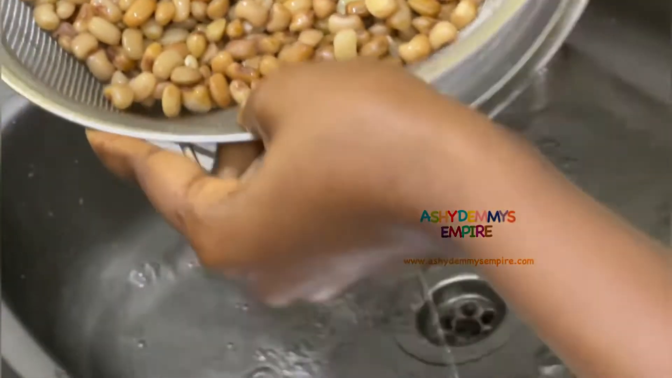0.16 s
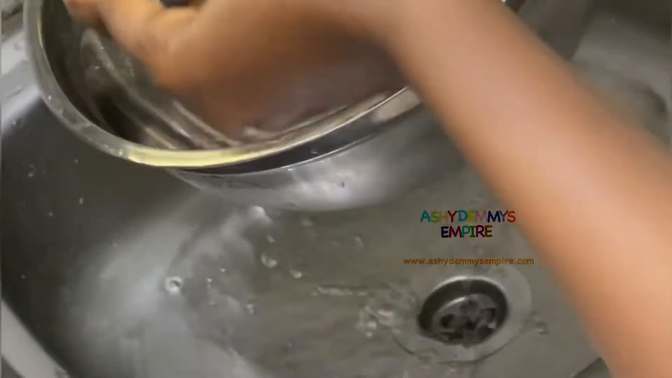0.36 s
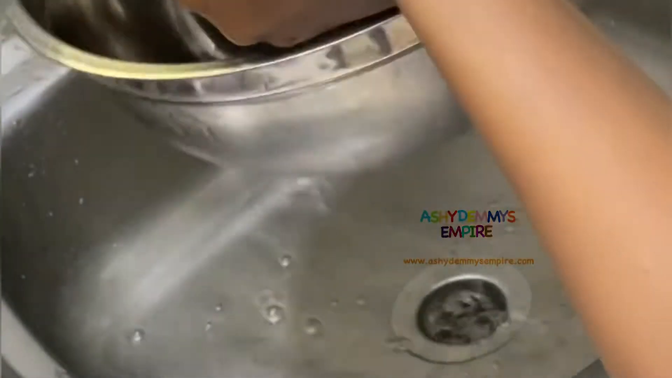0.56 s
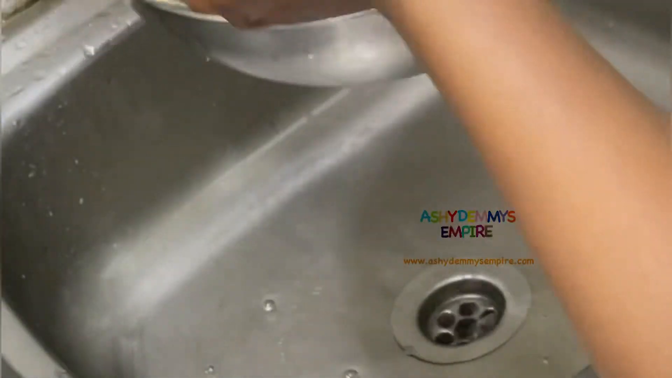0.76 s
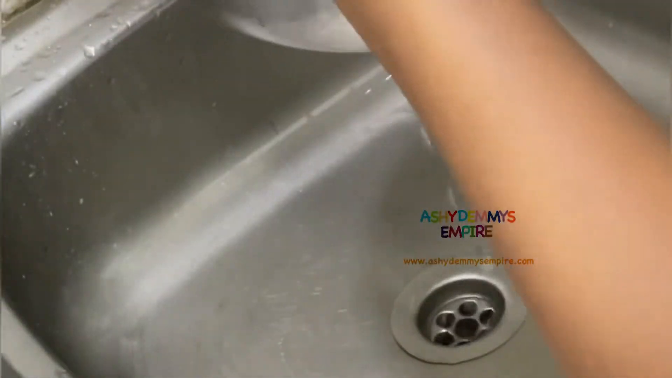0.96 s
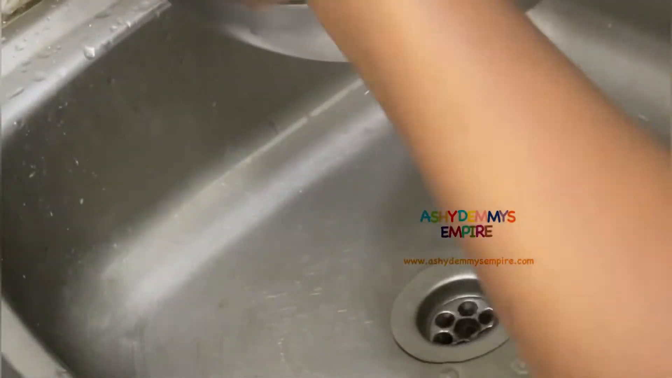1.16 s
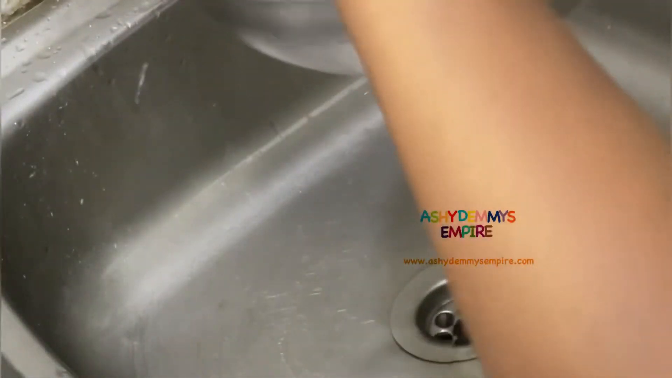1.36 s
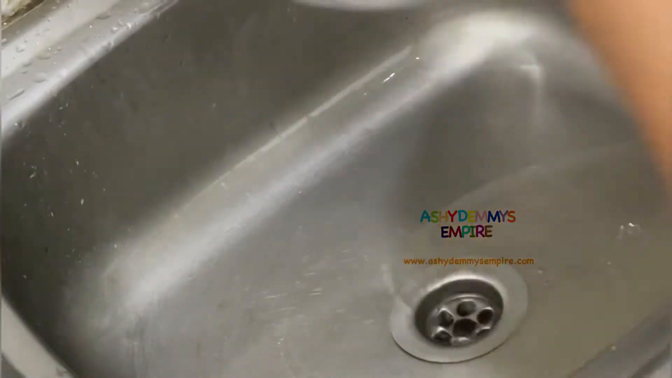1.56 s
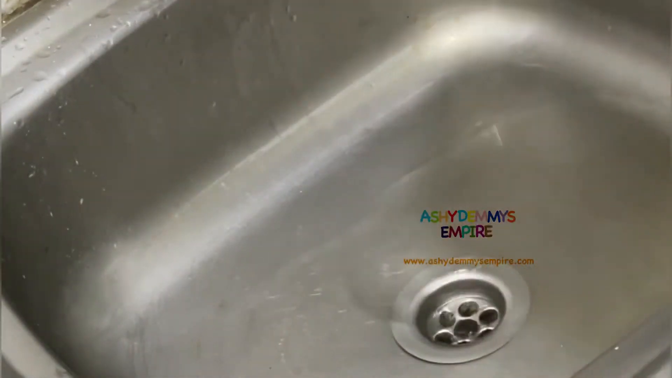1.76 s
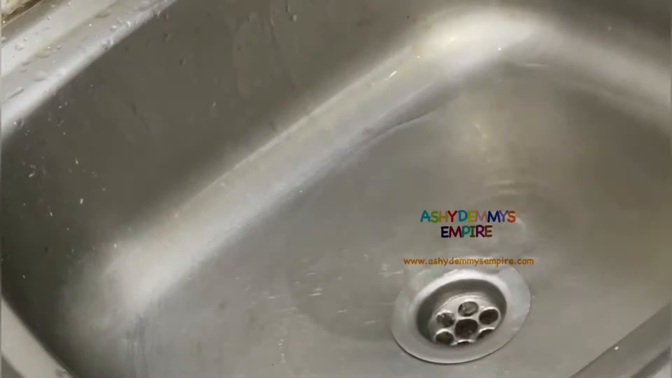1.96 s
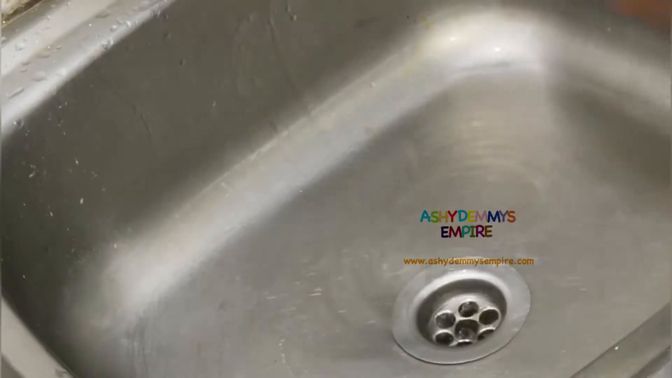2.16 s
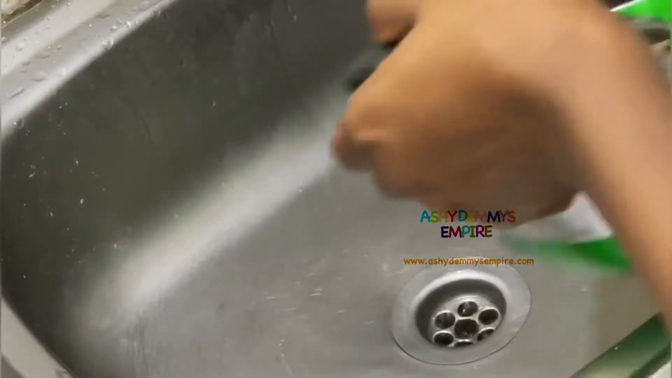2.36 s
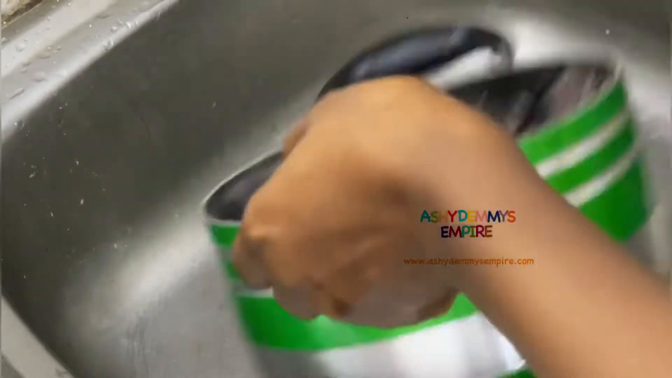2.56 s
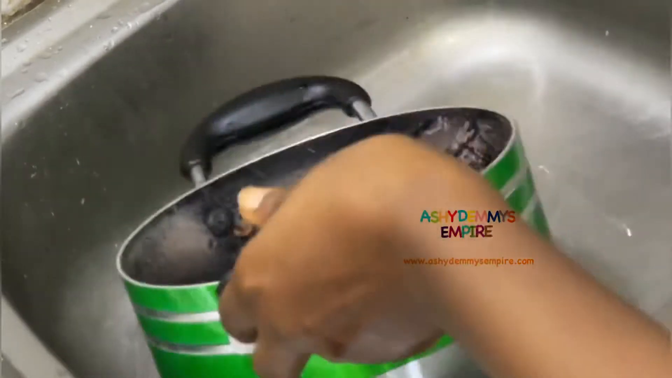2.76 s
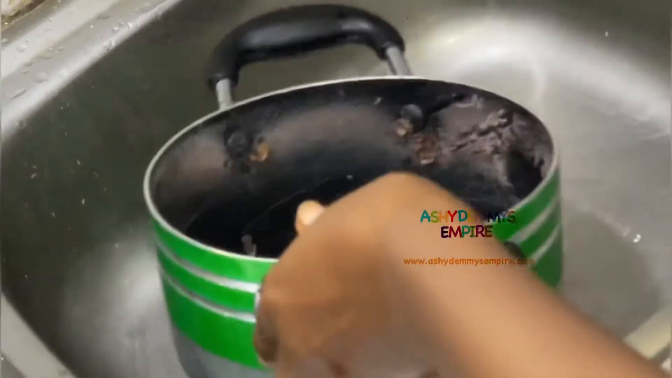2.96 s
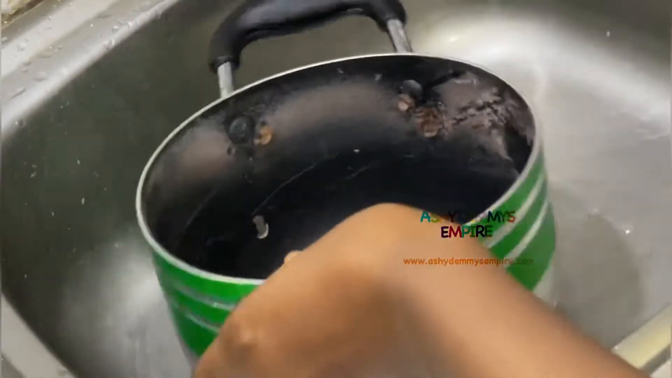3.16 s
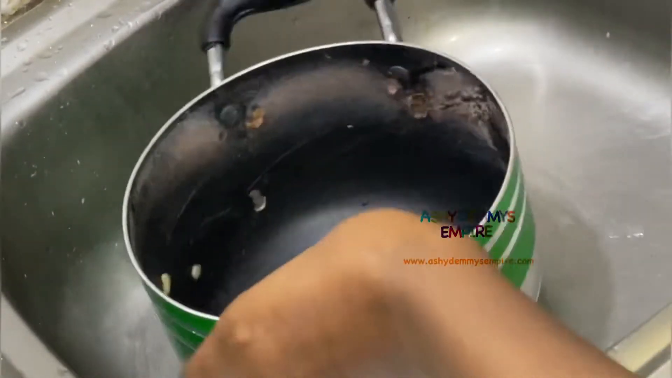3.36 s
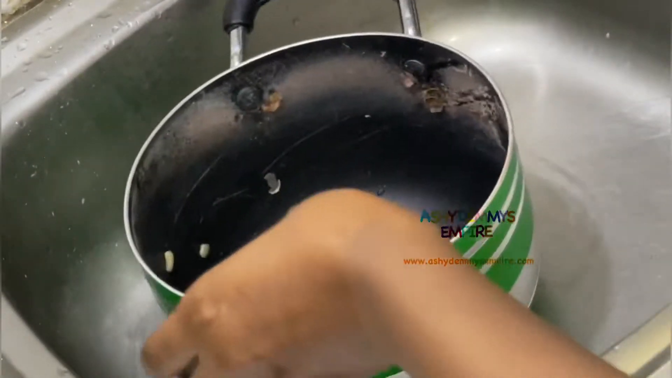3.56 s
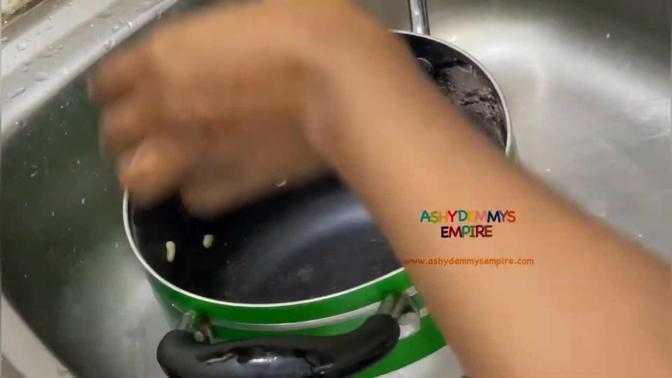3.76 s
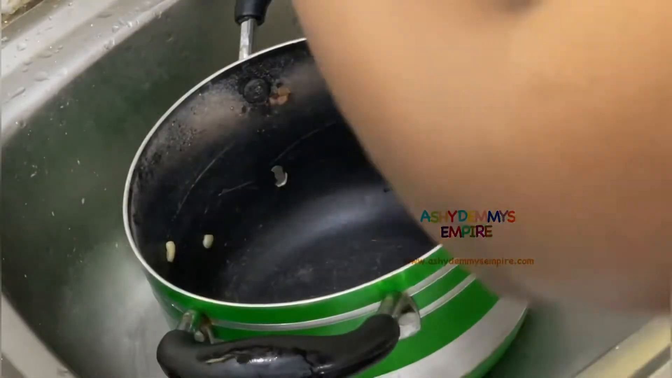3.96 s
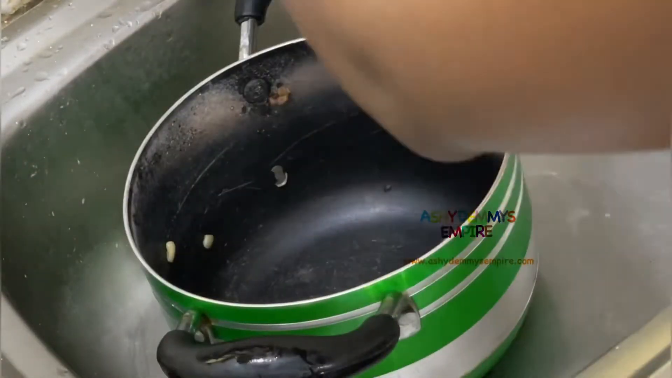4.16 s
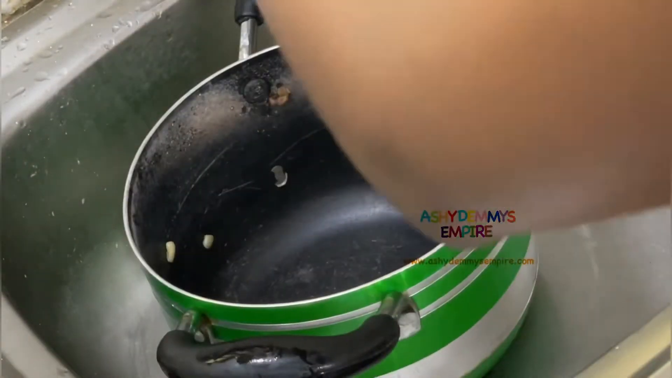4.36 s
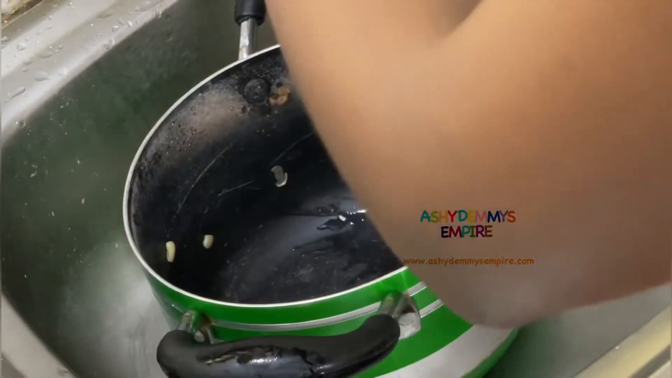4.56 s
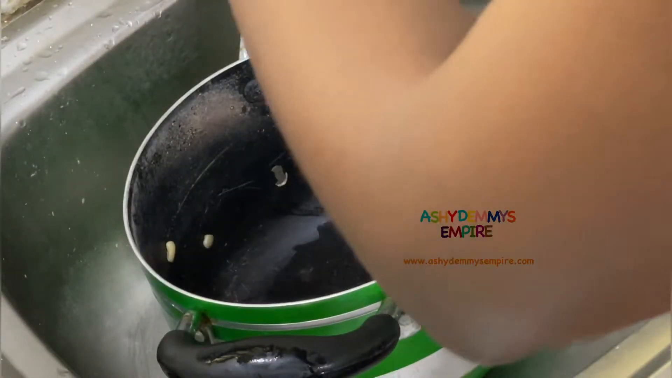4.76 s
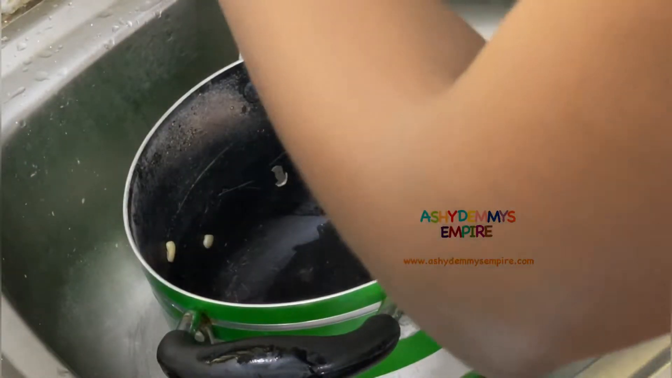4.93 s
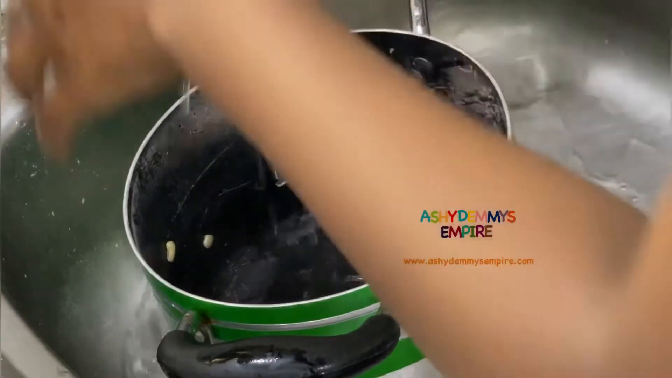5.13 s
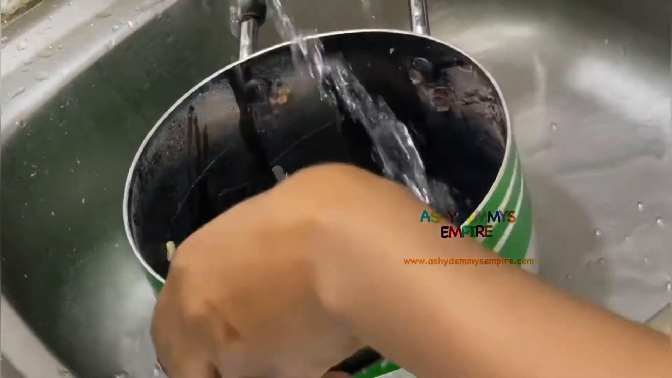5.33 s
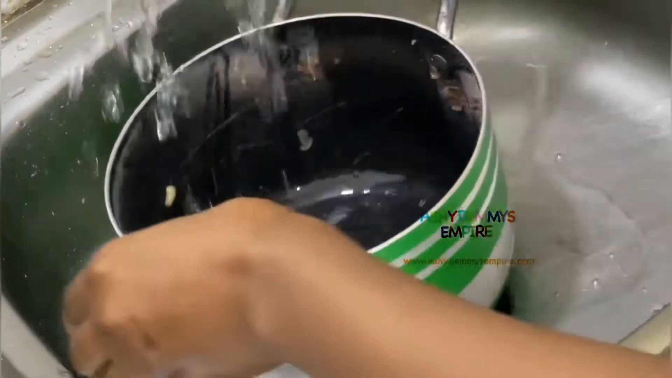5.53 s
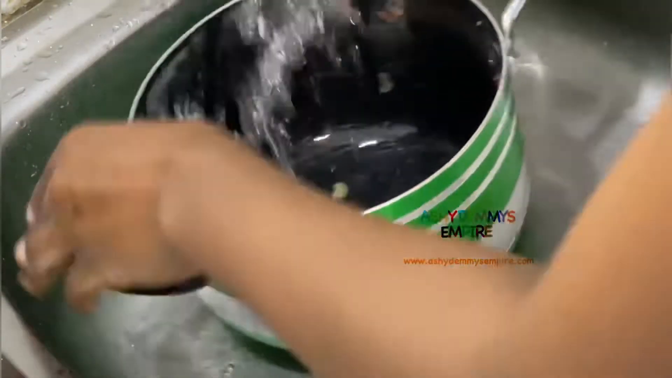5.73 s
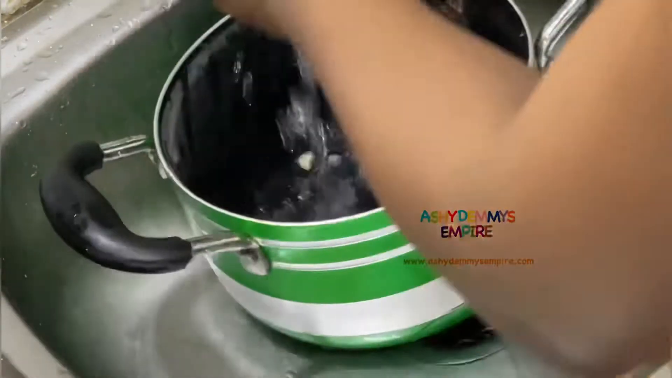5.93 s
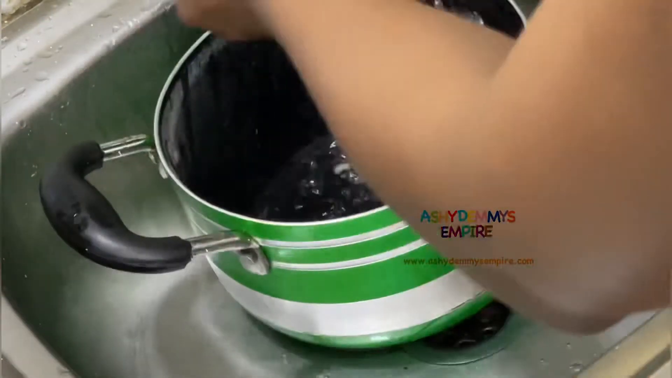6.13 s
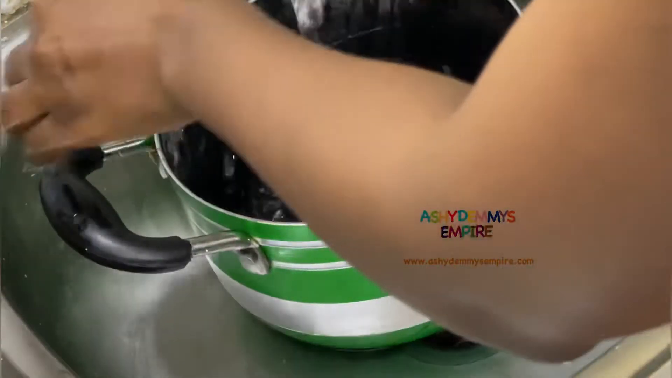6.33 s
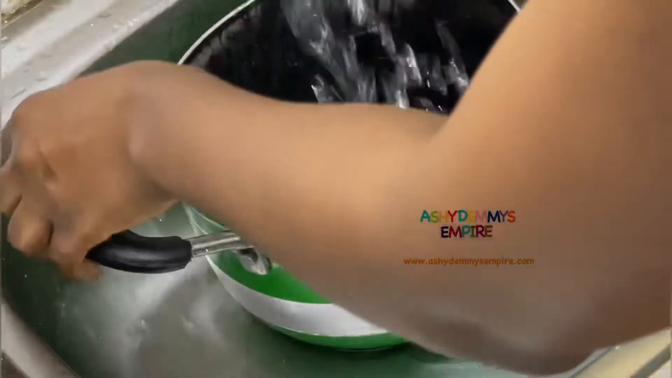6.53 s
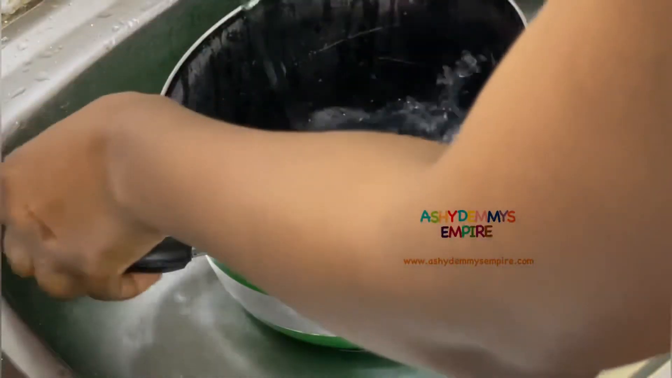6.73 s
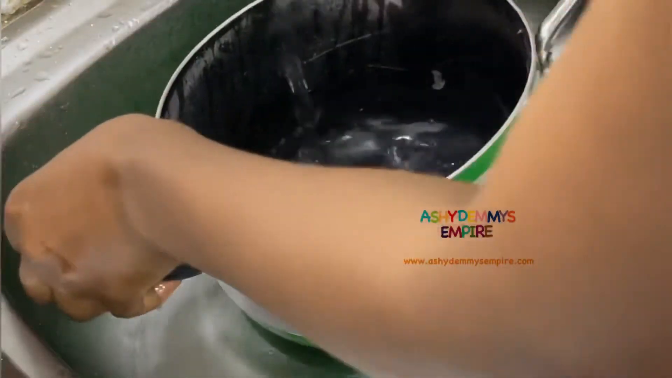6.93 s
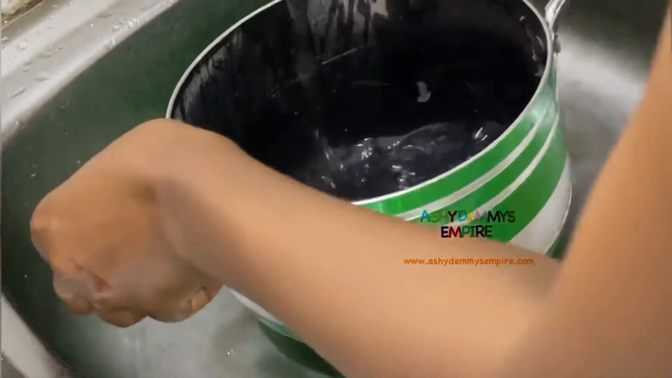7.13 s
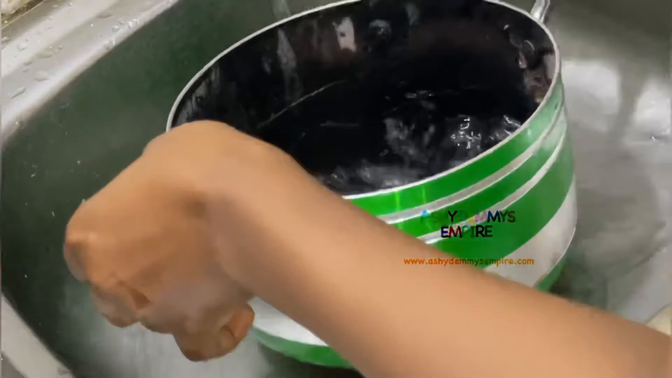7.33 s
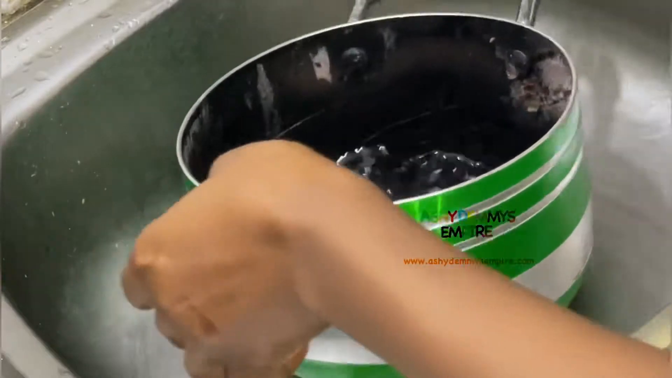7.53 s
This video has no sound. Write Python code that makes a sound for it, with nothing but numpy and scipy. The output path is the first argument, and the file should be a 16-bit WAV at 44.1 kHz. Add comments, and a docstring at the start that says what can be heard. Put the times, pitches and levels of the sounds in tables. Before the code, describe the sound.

A metal strainer of beans clanks into a steel bowl, a pot scrapes and bangs into a sink, then water gushes in.

```python
"""A strainer clanks brightly into a metal bowl, beans rustle and run-off trickles; then a pot is dragged over
a steel basin in short pushes and dropped in, and rinse water gushes in, spattering, bubbling and drumming.
Metal is struck modes plus dense noisy bands; scraping is stick-slip pulses and grit driving those modes.
Water is swarms of rising bubble tones and random clicks. A machine hums behind, over steady kitchen noise."""
import sys
import numpy as np
from scipy import signal
from scipy.fft import rfft, irfft, next_fast_len
from scipy.io import wavfile
from scipy.ndimage import uniform_filter1d

SR = 44100
rng = np.random.default_rng(int(sys.argv[2]) if len(sys.argv) > 2 else 0)


def int16_out(signal):
    """Quantize to a 16-bit WAV file."""
    q = np.round(np.clip(np.atleast_2d(signal).T, -1, 1) * 32767)
    wavfile.write(sys.argv[1], SR, q.astype(np.int16))


N = 334719
TIME = np.arange(N) / SR
EDGES = np.geomspace(30, 17000, 25)  # band limits in Hz
CENTRES = np.sqrt(EDGES[1:] * EDGES[:-1])

# dense upper modes of bowl and mesh: f/Hz, level per Hz/dB, t60/s
BOWL_WASH = [(60, -22, .3), (200, -3, 1), (473, 8.5, 0.53), (840, 13.5, 0.13), (1450, 4.5, 0.48),
             (2440, 6.5, 0.48), (4380, 6.5, 0.45), (7150, 7.5, 0.34), (12100, 1, 0.21), (15400, -3, 0.14)]
# modes of the basin with the pot in it: f/Hz, level/dB, t60/s (before a common length ratio)
SINK_MODES = [(57.4, 0, 0.73), (67.5, 11, 0.077), (96, -1.5, 0.69), (119.4, 7.5, 0.39), (217.3, -6.5, 1),
              (247, 10.5, 0.17), (309, 7.5, 0.2), (431, -7, 0.59), (468, -26, 0.79), (546, -9.5, 0.98),
              (578, -5, 0.27), (601, -4, 0.74), (731, 4.5, 0.22), (396.6, -7.5, 0.31), (905, -19.5, 0.32),
              (1020, -29, 0.57), (1174, -12, 0.65), (1700, -42, 0.31), (1780, -39, 0.22)]
# dense modes of pot and basin: f/Hz, level per Hz/dB, t60/s
SINK_WASH = [(41.4, 13, 0.36), (129, -5.5, 1), (268, -0.5, 0.85), (656, -1, 0.46), (970, 0.5, 0.51),
             (1940, -5, 0.45), (3800, -13.5, 0.5), (7100, -12.5, 0.35), (11000, -19.5, 0.35),
             (15400, -27, 0.3)]


def bowl():
    """The strainer clanks on the bowl; the hand damps and detunes its low modes; beans rustle on the mesh."""
    # strikes: t/s, clang level/dB, treble tilt/(dB per octave), ring level/dB, ring pitch ratio, length ratio
    hits = [(0.1729, -6, -1.5, -16, 0.97, 1.22), (0.56, -35, -0.5, -62, 0.82, 0.9),
            (0.6631, -6.5, -1.5, -11.5, 0.96, 0.46), (0.777, -26.5, 2.5, -51, 0.64, 0.18),
            (0.8046, -9.5, -9.5, -26, 0.95, 0.8), (0.886, -51, -9, -29.5, .94, 0.25),
            (1.236, -23.5, -16.5, -25, 0.94, 0.2)]
    # bowl modes: f/Hz, level/dB, t60/s (before the length ratio)
    bowl_modes = [(405.5, 2.5, 0.72), (587, 4.5, 0.065), (640, -16, 1), (1072, 1.5, 0.049),
                  (1140, -14, 0.26), (1647, -11.5, 0.48), (1840, -17, 0.32), (2250, -19, 0.23),
                  (3350, -26, 0.32), (3223, 2.5, 0.1), (3690, -14, 0.15), (4100, -19, 0.21),
                  (4420, -12, 0.22), (4950, -20, 0.27), (6200, -13, 0.37), (7084, -12, 0.2),
                  (7600, -22, 0.26)]
    # soft bump on the bowl's base: f/Hz, level per Hz/dB
    thunk = [(60, -27), (200, -3), (520, 22), (850, 6), (1150, 18), (1600, -6), (2500, 3), (15500, -6)]
    # jolts that shift the wet beans: t/s, length/s, level/dB
    shakes = [(0, 0.014, -59), (.7, 0.066, -33.5), (.795, 0.01, -21), (.87, 0.21, -49), (1.19, 0.17, -42)]
    # rustle of the mesh: f/Hz, level per Hz/dB
    mesh = [(1500, 4.5), (4500, -6), (6000, 3.5), (7500, 12), (10000, 4), (13000, 4), (15500, -1.5)]
    out = np.zeros(N)
    low = [mode for mode in bowl_modes if mode[0] < 1000]
    high = [mode for mode in bowl_modes if mode[0] >= 1000]
    hard = wash(BOWL_WASH, crack_t60=0.042, tail_db=-4.0, mode_spacing=25)
    soft = wash(BOWL_WASH, crack_t60=0.023, tail_db=-12.5, mode_spacing=3.2)  # a thunk leaves little tail
    for s, clang_db, tilt_db, ring_db, pitch, length in hits:
        bands, body = (hard, BOWL_WASH) if tilt_db > -2 else (soft, thunk)
        clang = blow(bands, body, tilt_db, contact_db=21.0)
        tilted = [(hz, db + tilt_db * np.log2(hz / 700), t60) for hz, db, t60 in high]
        partials = ring(tilted, length=np.sqrt(abs(length)), spread_db=-9.0)
        add(out, s, from_db(clang_db) * (clang + from_db(-12.0) * partials))
        add(out, s, from_db(ring_db) * ring(low, pitch, length, spread_db=1.5))
    rustle, = gains(shakes, attack_s=0.012, release_t60=0.39)
    sway = from_db(1.8 * drift(28))  # the sound wavers as the bowl moves in the hand
    return out * sway + rustle * colour(clicks(per_s=4100, spread_db=0.5), mesh)


def rim():
    """The strainer's thin rim clinks as it is set down: a bright crack and a few lasting partials."""
    # clinks: t/s, level/dB
    clinks = [(1.244, -21.5), (1.283, -11.5)]
    # rim modes: f/Hz, level/dB, t60/s
    rim_modes = [(1700, -12, 0.27), (2175, -20, 0.2), (2280, -22, 0.2), (2370, -24, .2),
                 (2580, -2.5, 0.017), (3190, -31, 0.28), (3460, 1, 0.032), (3900, -11, 0.11),
                 (4802, -27, 0.29), (4920, -12, 0.09), (5400, -24, 0.23), (5650, -26, .22),
                 (6740, -22, 0.17)]
    out = np.zeros(N)
    bands = wash(BOWL_WASH, crack_t60=0.06, tail_db=-2.5, mode_spacing=34)
    for s, db in clinks:
        crack = blow(bands, BOWL_WASH, tilt_db=1.0, contact_db=16.0)
        partials = ring(rim_modes, spread_db=5.0)
        add(out, s, from_db(db) * (from_db(-0.5) * crack + from_db(-1.5) * partials))
    return out


def pot():
    """The pot knocks on the basin at changing spots; each knock excites the basin's boom by its own amount."""
    # knocks: t/s, level/dB, treble tilt/(dB per octave), boom level before a common trim/dB
    hits = [(1.843, -23, -6, -52), (1.91, -22, -3.5, -68), (1.979, -26, -4, -33.5), (2.275, -14, -4, -23),
            (2.408, -34, -14, -49), (2.573, -8, 2.5, -8), (2.592, -3, -4.5, -14.5), (2.621, -15, -8.5, -45),
            (2.657, -10, -6, -18.5), (2.9685, -9, 0.5, -12), (2.979, -8, 0.5, -30), (3.107, -21, 2.5, -31),
            (3.2367, -16, -0.5, -31), (4.235, -29.5, -3, -43), (4.381, -21, -5.5, -34.5),
            (4.495, -24, 2.5, -36.5), (6.1, -32.5, -2.5, -50), (6.893, -25, -6, -49),
            (7.2223, -17.5, 0, -47), (7.338, -27, -6.5, -32.5)]
    knocks, booms = np.zeros((2, N))
    spots = [wash(SINK_WASH, crack_t60=0.053, tail_db=-2.5, mode_spacing=24) for spot in range(4)]
    for k, (s, db, tilt_db, boom_db) in enumerate(hits):
        knock = blow(spots[k % len(spots)], SINK_WASH, tilt_db, contact_db=14.0)
        knock += from_db(-20.5 + tilt_db) * wall_ring(t60=0.28)
        add(knocks, s, from_db(db) * knock)
        add(booms, s, from_db(boom_db - 5.0) * ring(SINK_MODES, length=0.76, spread_db=1.5))
    return knocks * from_db(0.46 * drift(160)) + booms * from_db(2.03 * drift(70))


def scrape():
    """The pot's base sticks and slips on steel: slips shake the basin, grit hisses and rings the pot's wall."""
    # pushes: t/s, length/s, then boom, judder and grit levels before each layer's trim/dB
    slides = [(2.055, 0.19, -26, -35, -39), (2.165, 0.0074, -24, -19.5, -25), (2.2, 0.049, -14, -22.5, -57),
              (2.31, 0.1, -41, -22.5, -35.5), (2.275, 0.014, -17, -13.5, -32),
              (2.383, 0.078, -27, -13, -30.5), (2.535, 0.04, -37, -35, -44), (2.7, 0.13, -26, -28, -51),
              (2.91, 0.04, -22, -25, -45.5), (3.115, 0.082, -17, -25, -27),
              (3.232, 0.075, -18, -25.5, -39.5), (3.305, 0.011, -38, -39, -54),
              (3.835, 0.097, -33.5, -40.5, -43), (3.92, 0.24, -41, -37.5, -51.5),
              (4.165, 0.11, -40, -48, -40), (4.29, 0.071, -39, -39, -45), (4.39, 0.025, -31, -31, -43),
              (4.46, 0.11, -27, -58, -39)]
    # hiss of the grit: f/Hz, level per Hz/dB
    grit_spectrum = [(900, 8), (1500, 0.5), (2500, 3.5), (4000, -0.5), (7000, 1), (10000, -1), (15500, -9)]
    attack_s, release_t60 = 0.035, 0.34  # a push takes hold, then the pot runs out
    boom, judder, grit = gains(slides, attack_s, release_t60)

    # one pulse per slip, about 110 a second at an uneven pace
    turns = np.floor(np.cumsum(110 * from_db(4 * drift(150))) / SR)
    slips = np.diff(turns, prepend=0) * from_db(5.1 * drift(300) + 2 * drift(45))
    sheet = signal.oaconvolve(slips, ring(SINK_MODES, length=0.56))[:N]
    sheet = sheet + from_db(11.0) * wandering(slips, moves_per_s=30, tilt_db=-1.8, count=4)
    low = colour(sheet, [(40, -27.5), (70, -17.5), (150, -16.5), (280, -22.0), (900, -61.0)])
    middle = colour(sheet, [(120, -30.5), (300, -7), (600, -4.0), (950, -4), (1500, -1.5), (5000, -18.5)])
    middle = middle + from_db(5.5) * sheet_resonance(middle, q=2.8)
    lumps = from_db(np.where(TIME > 3.5, 3, .5) * drift(50))  # the later, light nudges catch unevenly

    grains = clicks(per_s=4000, spread_db=1.0) * from_db(2 * drift(60))
    wall = rms_one(signal.oaconvolve(grains, wall_ring(t60=0.047))[:N])
    wall_gain = from_db(np.where(TIME > 2.8, -9, -2))
    hiss = from_db(1.5) * colour(grains, grit_spectrum) + wall_gain * wall

    # one push makes a single mode of the pot's wall sing
    singing = steady(signal.lfilter(*signal.iirpeak(2330, 90, fs=SR), grains), size=2000)
    squeal = from_db(-34.5) * envelope(2.4, 0.084, attack_s, release_t60) * singing
    rumble = from_db(-6.5) * boom * steady(low, size=3000)
    shudder = from_db(-3.0) * judder * lumps * steady(middle, size=1500)
    return rumble + shudder + grit * hiss + squeal


def sheet_resonance(x, q):
    """A resonance of the steel sheet that follows the pot across the basin."""
    # main resonance as the pot moves: t/s, f/Hz
    sheet_pitch = [(2.15, 735), (2.23, 524), (2.29, 704), (2.39, 430), (2.47, 610), (2.55, 570), (3.0, 660),
                   (3.3, 440), (3.92, 920), (4.02, 655), (4.12, 487), (4.24, 900), (4.4, 510)]
    out, state, size = np.zeros(N), np.zeros(2), 512
    for i in range(0, N, size):
        hz = np.interp(i / SR, *np.transpose(sheet_pitch))
        peak = signal.iirpeak(hz, q, fs=SR)
        out[i:i + size], state = signal.lfilter(*peak, x[i:i + size], zi=state)
    return out


def wall_ring(t60):
    """One touch on the pot's thin wall; its strongest mode starts near height 1."""
    # wall modes: f/Hz, level before a shift that brings the strongest to 0/dB
    wall_modes = [(1362, -45), (1653, -59), (2340, -51.5), (2821, -56), (3085, -54), (3461, -50),
                  (3817, -52.5), (4764, -62), (5170, -51.5), (6272, -59), (6993, -100), (7833, -48)]
    top = max(db for hz, db in wall_modes)
    return ring([(hz, db - top, t60) for hz, db in wall_modes], spread_db=3)


def wandering(contacts, moves_per_s, tilt_db, count):
    """Contacts land on changing spots of the basin, each of which rings with modes of its own."""
    spot = rng.integers(0, count, 4000)[(TIME * moves_per_s).astype(int)]
    out = np.zeros(N)
    for k in range(count):
        bands = wash(SINK_WASH, crack_t60=0.013, tail_db=-5, mode_spacing=26.0)
        body = blow(bands, SINK_WASH, tilt_db, contact_db=16.5)
        out += signal.oaconvolve(contacts * (spot == k), body)[:N]
    return out


def rattle():
    """After a heavy landing the pot's rocking base taps the steel at uneven intervals."""
    # rocking: t/s, length/s, level/dB
    rocking = [(2.61, 0.084, -23), (2.73, 0.088, -38.5), (3.0, .05, -24), (3.15, 0.13, -40)]
    level, = gains(rocking, attack_s=0.0068, release_t60=0.4)
    turns = np.floor(np.cumsum(55 * from_db(4 * drift(60))) / SR)
    taps = np.diff(turns, prepend=0) * from_db(4 * drift(90))
    return level * steady(wandering(taps, moves_per_s=75, tilt_db=-3.0, count=3), size=4000)


def touches():
    """Spots of bowl, pot and basin ring out briefly when they touch, each as a cluster of close modes."""
    # spots: t/s, f/Hz, level/dB, t60/s
    contacts = [(.664, 493, -18.5, 0.23), (.806, 574, -23, 0.44), (0.805, 1117, -19.5, 0.14),
                (1.2355, 476, -22, 0.087), (2.275, 455, -9, 0.17), (2.276, 712, -13.5, 0.3),
                (2.395, 387, -14.5, 0.39), (2.406, 254, -13, 0.5), (2.44, 558, -12, 0.32),
                (2.575, 722, 0.5, 0.2), (2.58, 455, -11, .2), (2.59, 873, -17, .2), (2.62, 1146, -20, 0.55),
                (2.967, 5450, -17, 0.055), (2.97, 700, -17, 0.68), (2.973, 1353, -11.5, 0.19),
                (2.975, 223, -34, 0.31), (2.98, 305, -10, 0.25), (3.84, 249, -26, 0.17),
                (3.914, 690, -38, 0.11), (4.007, 615, -35, 0.087), (4.043, 2320, -33.5, 0.028),
                (4.075, 2190, -36.5, 0.05), (4.11, 574, -33, 0.089), (4.232, 837, -31, 0.14),
                (4.324, 514, -43, 0.093), (4.38, 907, -26.5, 0.069), (4.386, 413, -33, 0.11)]
    # close modes of a spot: pitch ratio, level/dB
    spot_modes = [(0.88, -9), (1.001, -2), (1.13, -14)]
    out = np.zeros(N)
    for s, hz, db, t60 in contacts:
        modes = [(hz * ratio, db + mode_db, t60) for ratio, mode_db in spot_modes]
        add(out, s, ring(modes, spread_db=0.5))
    return out


def water():
    """Gushes break into clumps: spray and small bubbles on top, large bubbles and a drumming base below."""
    # gushes: t/s, length/s, flow level/dB, spray off bare metal re flow/dB, plunge into water re flow/dB
    gushes = [(4.804, 0.25, -40.5, -5.5, -6), (5.246, 0.026, -44.5, 10, -25),
              (5.391, 0.19, -37.5, -9, -5.5), (5.554, 0.24, -41, 1.5, 4.5), (5.824, 0.12, -45.5, 5, -1),
              (5.997, 0.14, -48.5, -20, -2), (6.185, 0.2, -37.5, -1, -16), (6.503, 0.21, -39.5, 0, -13.5),
              (6.748, 0.27, -47.5, -6.5, 6.5), (6.89, 0.03, -53.5, -11, 22), (7.148, 0.081, -35.5, -8, -9),
              (7.211, 0.064, -27.5, -17, 2), (7.3, 0.045, -42, -4.5, 16), (7.477, 0.023, -31.5, -21, -2.5)]
    # spectra, each f/Hz, level per Hz/dB: pot base, large bubbles, small bubbles, fine droplets
    drum_spectrum = [(70, -7.5), (115, 15), (200, 0), (300, 2), (450, -14), (900, -52)]
    gurgle_spectrum = [(200, -4), (350, 4), (700, 15.5), (1200, 14), (1800, 8), (3500, -19)]
    fizz_spectrum = [(900, 2), (1500, -31), (2300, 2), (3700, 0), (5000, -9), (8000, -3), (15000, -28)]
    spray_spectrum = [(2000, -13.5), (4000, 3.5), (6000, 2), (8000, 5), (10500, 5.5), (14000, 2),
                      (15500, -5)]
    # single bubbles and plinks that stand out: t/s, f/Hz, level/dB, t60/s
    plops = [(1.03, 2920, -38, 0.08), (1.126, 3130, -44, 0.087), (3.868, 3850, -32.5, 0.095),
             (4.448, 2980, -25, 0.018), (4.825, 3690, -21.5, 0.031), (4.993, 2100, -24, 0.015),
             (5.161, 2740, -36, 0.027), (5.213, 4860, -16.5, 0.0074), (5.249, 4220, -13.5, 0.0054),
             (5.283, 5500, -34, 0.016), (5.326, 3960, -31, .03), (5.437, 4200, -5.5, 0.0038),
             (5.542, 3800, -22, 0.026), (5.554, 2600, -33, .04), (5.61, 6860, -25, 0.017),
             (5.682, 3900, -26.5, 0.024), (5.749, 6360, -24, 0.022), (5.769, 2710, -33, 0.055),
             (5.781, 2750, -31.5, 0.061), (5.829, 6600, -26, .025), (5.875, 2084, -29, 0.039),
             (5.882, 6600, -26, .025), (5.944, 2790, -29.5, 0.033), (5.96, 1820, -32, .05),
             (6.099, 636, -28.5, 0.053), (6.109, 1650, -33, .03), (6.166, 3580, -33, 0.027),
             (6.215, 3800, -30, .04), (6.264, 6230, -23, 0.025), (6.273, 3600, -9.5, 0.015),
             (6.274, 1220, -30, .04), (6.289, 1234, -24, 0.027), (6.31, 3500, -21, .022),
             (6.386, 4550, -15, .013), (6.395, 5170, -14, 0.0078), (6.494, 3800, -25.5, .02),
             (6.533, 2380, -27, 0.04), (6.535, 3360, -26, .02), (6.566, 6750, -21, 0.016),
             (6.673, 2060, -23.5, 0.042), (6.751, 4280, -25, .025), (6.76, 3500, -15, 0.0073),
             (6.894, 622, -13.5, 0.028), (7.128, 2180, -16.5, 0.021), (7.223, 2150, -19, 0.036),
             (7.229, 885, -19, 0.085), (7.24, 1700, -23, 0.09), (7.274, 950, -22, .04),
             (7.298, 448, -19.5, 0.099), (7.333, 626, -21, 0.058), (7.345, 727, -17.5, 0.054),
             (7.499, 2250, -26, 0.093)]
    # air pockets that close up: t/s, length/s, start f/Hz, end f/Hz, level/dB
    glugs = [(5.266, .02, 2000, 3300, -26), (5.858, .026, 1350, 2300, -31), (5.938, .014, 2000, 2500, -34),
             (6.46, .018, 1280, 1750, -31), (7.328, .037, 540, 1750, -19.5)]
    # loudest drops slapping on metal: t/s, level before a common boost/dB
    slaps = [(0.034, -46), (.312, -41), (3.29, -41), (3.815, -43.5), (3.914, -54), (4.43, -35),
             (4.446, -27.5), (4.525, -26), (4.757, -43.5), (5.034, -35), (5.17, -39.5), (5.212, -31.5),
             (5.249, -36), (5.343, -27.5), (5.437, -31.5), (5.5422, -27), (5.578, -28), (5.637, -36),
             (5.857, -36), (5.928, -32), (6.035, -39.5), (6.092, -33), (6.11, -38), (6.3865, -28.5),
             (6.398, -25.5), (6.497, -32), (6.532, -31), (6.937, -39.5), (7.128, -33.5), (7.187, -30.5),
             (7.498, -31.5)]
    # splash of one drop: f/Hz, level per Hz/dB, t60/s
    splash = [(100, -27, .2), (700, -14, .25), (2060, 20, 0.2), (4470, 18, 0.52), (9200, 12.5, 0.068),
              (16000, -0.5, .2)]
    rows = [(s, length, db, db + spray_db, db + plunge_db) for s, length, db, spray_db, plunge_db in gushes]
    # the front lands, the tail dribbles out
    flow, spray, plunge = gains(rows, attack_s=0.025, release_t60=0.45)
    clumps = from_db(3 * drift(110))

    out = from_db(-4) * plunge * colour(clicks(per_s=430, spread_db=1.0), drum_spectrum)
    large = bubbles(340, 1560, cycles=17.0, rise=0.039, spread_db=2.5, count=2000)
    large = large + rms_one(clicks(per_s=3700, spread_db=7.5))
    out += from_db(-5.5) * plunge * colour(large, gurgle_spectrum)
    small = bubbles(1238, 7560, cycles=50, rise=0.058, spread_db=-2.0, count=3500)
    small = small + from_db(-3.0) * rms_one(clicks(per_s=5200, spread_db=0.0))
    out += from_db(-8.5) * flow * clumps * colour(small, fizz_spectrum)
    out += from_db(-5.5) * flow * clouds(count=1500)
    out += from_db(3) * spray * clumps * colour(clicks(per_s=5300, spread_db=4.5), spray_spectrum)

    for s, hz, db, t60 in plops:
        add(out, s, from_db(db) * bubble(hz, t60, rise=0.035))
    for s, length, start_hz, end_hz, db in glugs:
        add(out, s, from_db(db) * glug(length, start_hz, end_hz))
    splashes = [wash(splash, crack_t60=0.03, tail_db=-39, mode_spacing=9.5) for drop in range(3)]
    for k, (s, db) in enumerate(slaps):
        slap = blow(splashes[k % len(splashes)], splash, tilt_db=6.5, contact_db=8.0)
        add(out, s, from_db(db + 7.0) * slap)
    return out + from_db(-5.5) * echoes(out, t60=0.35)


def bubble(hz, t60, rise):
    """A bubble rings and rises in pitch as it nears the surface."""
    t = TIME[:int(t60 * SR) + 2]
    tone = np.sin(2 * np.pi * hz * t * (1 + rise * t / t60))
    return tone * from_db(-60 * t / t60) * (1 - np.exp(-t * hz))


def bubbles(low_hz, high_hz, cycles, rise, spread_db, count):
    """A swarm of bubbles of random sizes, ringing for about the given number of cycles; rms 1."""
    out = np.zeros(N)
    for when, size, strength, life in rng.random((count, 4)):
        hz = low_hz * (high_hz / low_hz) ** size
        gain = from_db(-spread_db * np.log(strength + 0.046))
        add(out, when * N / SR, gain * bubble(hz, cycles * (.5 + life) / hz, rise))
    return rms_one(out)


def clouds(count):
    """Each clump of water traps three rising bubbles of like size within 20 ms; rms 1."""
    out = np.zeros(N)
    for when, size, strength in rng.random((count, 3)):
        for delay, unlike in rng.random((3, 2)):
            hz = 1300 * 5 ** size * (1 + .3 * unlike)
            start = when * (N / SR - .03) + .02 * delay
            add(out, start, (strength + .12) ** -.45 * bubble(hz, 32 / hz, .1))
    return rms_one(out)


def glug(length, start_hz, end_hz):
    """A pocket of air swells into sound and climbs in pitch as it shrinks."""
    life = np.linspace(0, 1, int(length * SR))
    hz = start_hz * (end_hz / start_hz) ** life
    return np.sin(np.pi * life ** .7).clip(0) * np.sin(2 * np.pi * np.cumsum(hz) / SR)


def trickle():
    """Run-off from the strainer patters in the basin and bubbles into the drain, then trickles away."""
    # patter of the drops: f/Hz, level per Hz/dB
    patter_spectrum = [(1000, 5.5), (3000, 0), (5000, 0), (7500, -1), (15500, -11)]
    patter = colour(clicks(per_s=1700, spread_db=5.0), patter_spectrum)
    plinks = bubbles(1700, 3500, cycles=120, rise=0.05, spread_db=1.0, count=700)
    level = from_db(-52.5) * envelope(0, 1.98, attack_s=0.0029, release_t60=0.48)
    return level * (patter + from_db(-3.0) * plinks)


def background():
    """A machine hum of sines wavering in level and phase, over the kitchen's steady noise."""
    # hum partials: f/Hz, rms level/dB
    hum_partials = [(49.5, -40.5), (72, -67), (90, -51), (105, -54), (117, -48)]
    # kitchen noise: f/Hz, level per Hz/dB
    room_tone = [(30, -27), (50, 4), (100, -2.5), (170, 3), (300, -4), (600, -10.5), (1200, -13),
                 (2500, -19.5), (5000, -27.5), (9000, -31), (15500, -33.5)]
    hum = np.zeros(N)
    for hz, db in hum_partials:
        level = from_db(db + 0.87 * drift(1.2)) * np.sqrt(2)
        hum += level * np.sin(2 * np.pi * hz * TIME + 0.55 * drift(7.3))
    return hum + from_db(-43.5) * colour(rng.standard_normal(N), room_tone)


def ring(modes, pitch=1, length=1, spread_db=2):
    """One blow on a set of modes, each a decaying sine with a random strength and sign."""
    out = np.zeros(SR)
    for hz, db, t60 in modes:
        strength = from_db(db + spread_db * rng.normal()) * rng.choice([-1, 1])
        out += strength * fade(t60 * length) * np.sin(2 * np.pi * hz * pitch * TIME[:SR])
    return out


def wash(body, crack_t60, tail_db, mode_spacing):
    """Per band: a short noisy crack, then a tail of randomly placed modes dying at the band's own rate."""
    hz = np.arange(SR // 2 + 1)
    share = np.clip(1 / mode_spacing + 30 / (hz + 1), 0, 1)  # chance of a mode in each Hz
    present = (rng.random(len(hz)) < share) / np.sqrt(share)
    modes = rms_one(irfft(present * np.exp(2j * np.pi * rng.random(len(hz))), SR))
    cracks = rng.standard_normal((2, SR)) * fade(crack_t60)
    bands = []
    for k, t60 in enumerate(at_hz(body, CENTRES, axis=2)):
        band = signal.butter(2, EDGES[k:k + 2], "band", fs=SR, output="sos")
        bands.append(signal.sosfilt(band, cracks[k % 2] + from_db(tail_db) * modes * fade(t60)))
    return np.array(bands)


def blow(bands, body, tilt_db, contact_db):
    """Milliseconds of contact chatter over the body's wash; a harder contact tilts both upward."""
    gain = from_db(at_hz(body, CENTRES) + tilt_db * np.log2(np.maximum(CENTRES, 400)))
    out = gain @ bands / np.sqrt(np.sum(gain ** 2 * np.diff(EDGES)) * 2 / SR)
    chatter = (rng.standard_normal(SR) * fade(t60=0.0047))[:SR // 20]
    contact = signal.oaconvolve(response(CENTRES, gain), chatter)
    out[:len(contact)] += from_db(contact_db) * contact / np.linalg.norm(contact)
    return out


def clicks(per_s, spread_db):
    """Random contacts of random sign, their sizes as uneven as the spread."""
    size = from_db(spread_db * np.minimum(rng.exponential(1, N), 4.5))
    return (rng.random(N) < per_s / SR) * size * rng.choice([-1, 1], N)


def echoes(x, t60):
    """Dense reflections of equal total power, starting after a 1.5 ms flight."""
    tail = rng.standard_normal(SR) * fade(t60) * (TIME[:SR] > .0015)
    return signal.oaconvolve(x, tail / np.linalg.norm(tail))[:N]


def envelope(s, length, attack_s, release_t60):
    """Rise from the start time, hold until the length is over, then die away."""
    release = from_db(-60 * np.maximum(TIME - s - length, 0) / release_t60)
    return np.clip((TIME - s) / attack_s, 0, 1) * release


def gains(rows, attack_s, release_t60):
    """One gain curve per dB column of (t/s, length/s, level/dB, ..); overlapping events add in power."""
    shapes = np.array([envelope(s, length, attack_s, release_t60) for s, length, *levels in rows])
    return np.sqrt(from_db(np.array(rows)[:, 2:].T) ** 2 @ shapes ** 2)


def fade(t60):
    """One second of exponential decay, falling 60 dB in t60 seconds."""
    return from_db(-60 * TIME[:SR] / np.maximum(t60, .001))


def drift(rate):
    """Random wander of spread about 1, gliding between the given number of random values a second."""
    knots = rng.standard_normal(4000)
    return np.interp(TIME * rate, np.arange(len(knots)), knots) * np.sqrt(3 / 2)


def colour(x, spectrum):
    """Filter a signal by a spectrum of f/Hz, level/dB; rms 1."""
    hz, db = np.transpose(spectrum)
    return rms_one(signal.oaconvolve(x, response(hz, from_db(db)))[:N])


def response(hz, gain):
    """Impulse response of a causal (minimum-phase) filter; unit energy."""
    size = 8192
    log_gain = np.interp(np.log(np.fft.rfftfreq(size, 1 / SR) + 1), np.log(hz), np.log(gain))
    cepstrum = irfft(log_gain)
    causal = 2 * cepstrum[:size // 2] * (np.arange(size // 2) > 0)
    pulse = irfft(np.exp(rfft(causal, size)))
    return pulse / np.linalg.norm(pulse)


def steady(x, size):
    """Even out a signal's level over the given number of samples."""
    return x / np.sqrt(np.abs(uniform_filter1d(x ** 2, size=size)) + 1e-9)


def from_db(db):
    """Decibels to gain."""
    return 10 ** (np.asarray(db) / 20)


def rms_one(x):
    """Scale to unit power."""
    return x / np.sqrt(np.mean(x ** 2) + 1e-20)


def at_hz(points, hz, axis=1):
    """Read a column of a table on a log-frequency axis."""
    table = np.array(points)
    return np.interp(np.log(np.maximum(hz, 1)), np.log(table[:, 0]), table[:, axis])


def add(out, s, sound):
    """Mix a sound in at a given time in seconds."""
    start = max(round(s * SR), 0)
    out[start:start + len(sound)] += sound[:N - start]


def scene():
    """All sounds share the centre; basin reflections reach left and right with opposite sign."""
    # level tilt between the sides: f/Hz, left minus right level/dB
    lean = [(60, -0.5), (200, 0.5), (700, 3), (2400, -0.5)]
    # reflections that differ between the sides: f/Hz, level/dB
    width = [(60, -16.5), (170, -11), (330, -11), (550, -2), (1000, -3.5), (1800, -27), (3200, -97),
             (6000, -9.5), (7800, -9), (8900, -26), (10500, -3.5), (12000, -53), (13500, -41)]
    centre = bowl() + rim() + pot() + scrape() + rattle() + touches() + water() + trickle() + background()
    size = next_fast_len(N + SR // 2)
    hz, sign = np.fft.rfftfreq(size, 1 / SR), np.array([[1], [-1]])
    side = rfft(echoes(centre, t60=.15), size) * from_db(at_hz(width, hz))
    middle = rfft(centre, size) * from_db(.5 * sign * at_hz(lean, hz))
    return irfft(middle + sign * side, size)[:, :N]


def record(dry):
    """Two microphone ports shift the treble's phase apart, the loudest blows overload, bottom and top are cut."""
    # phase between the ports: f/Hz, lead of the left/rad
    port_phase = [(100, 0), (2400, 0), (3400, .45), (5300, .4), (5800, -1.6), (6700, -.65), (7300, -1.2),
                  (7700, -2.4), (8500, -3.05), (9400, -3.25), (10000, -3.85), (11500, -4.9), (12800, -6.2),
                  (15000, -6.3)]
    size = next_fast_len(N + SR // 2)
    lead = at_hz(port_phase, np.fft.rfftfreq(size, 1 / SR))
    ports = irfft(rfft(dry, size) * np.exp(.5j * lead * np.array([[1], [-1]])), size)[:, :N]
    ports = signal.sosfilt(signal.butter(6, 41, "high", fs=SR, output="sos"), ports)
    limited = ports / (1 + ports ** 12) ** (1 / 12)
    return signal.sosfilt(signal.ellip(10, .3, 70, 15850, fs=SR, output="sos"), limited)


dry = scene()
out = record(dry)
int16_out(out)
```